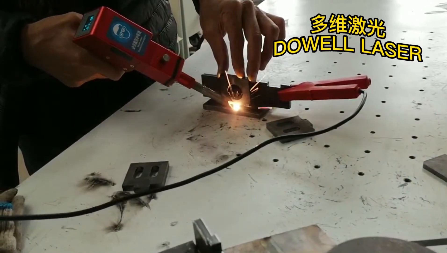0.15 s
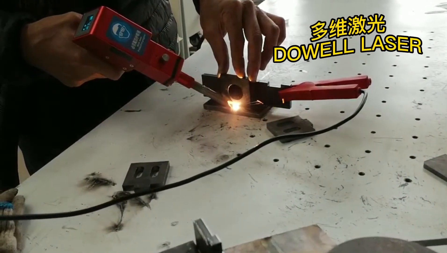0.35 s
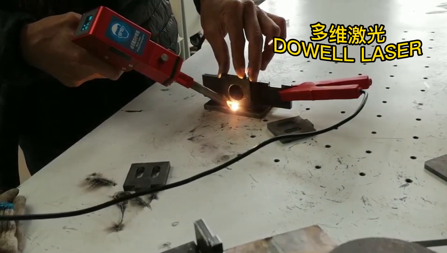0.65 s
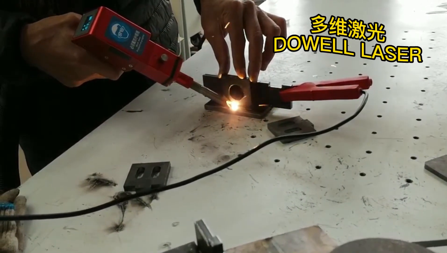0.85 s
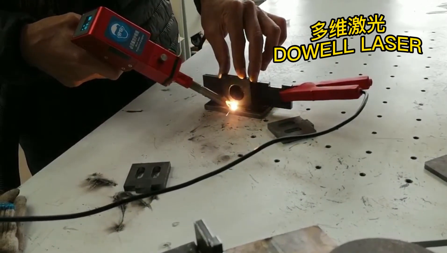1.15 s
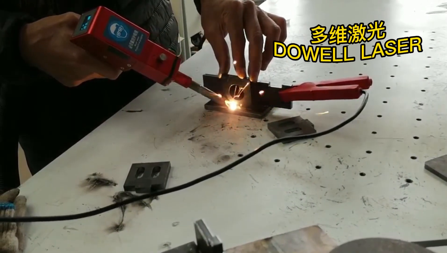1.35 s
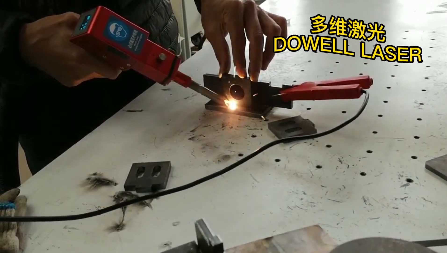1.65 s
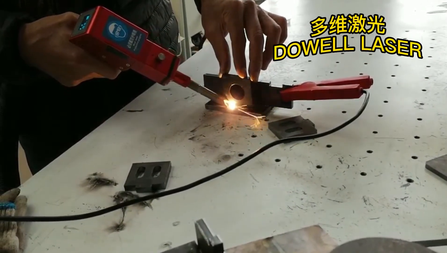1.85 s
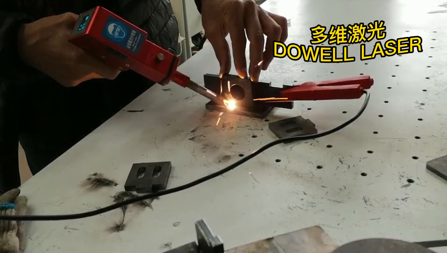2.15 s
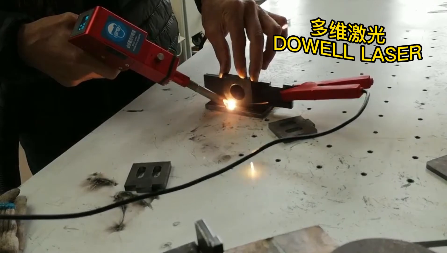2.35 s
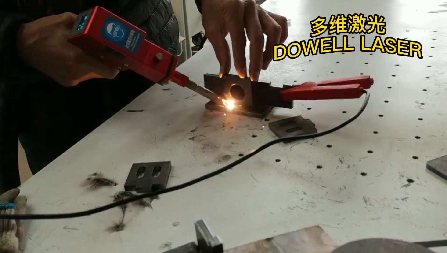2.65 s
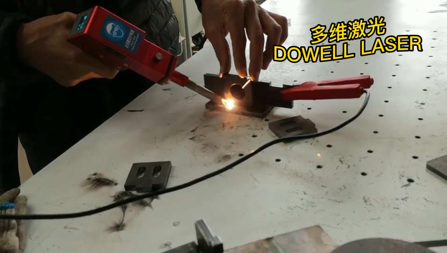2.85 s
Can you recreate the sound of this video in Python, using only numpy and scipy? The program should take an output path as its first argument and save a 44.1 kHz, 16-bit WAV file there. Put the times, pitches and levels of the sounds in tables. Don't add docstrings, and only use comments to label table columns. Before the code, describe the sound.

Bright gas jet hissing without pause from a laser welding torch, faint machine hum far behind

```python
import sys
import numpy as np
from scipy import signal
from scipy.fft import rfft, irfft, next_fast_len
from scipy.io import wavfile
from scipy.ndimage import uniform_filter1d, map_coordinates

SR = 44100
rng = np.random.default_rng(int(sys.argv[2]) if len(sys.argv) > 2 else 0)


def store_wav(level_fs):
    pcm = np.round(np.clip(np.atleast_2d(level_fs), -1, 1) * 32767)
    wavfile.write(sys.argv[1], SR, pcm.T.astype(np.int16))


def decibels_to_gain(level_db):
    exponent = np.asarray(level_db, float) / 20
    return 10 ** exponent


N = 132300


def unit(x):
    return x / np.sqrt(np.mean(x ** 2) + 1e-20)


def along(points, hz):
    f, v = np.transpose(points)
    return np.interp(np.log(hz + 1), np.log(f + 1), v)


def curves(rows):
    s, *cols = np.transpose(rows)
    return [np.interp(np.arange(N) / SR, s, c) for c in cols]


def wobble(rate):
    return map_coordinates(rng.standard_normal(N // 64), [np.arange(N) * min(rate, 600) / SR])


def filtered(x, response):
    m = next_fast_len(N + SR // 2)
    return irfft(rfft(x, m) * response(np.fft.rfftfreq(m, 1 / SR)), m)[..., :N]


def bumps(rows, hz):
    return sum(db / (1 + (2 * (hz - c) / w) ** 2) for c, w, db in rows)


def swells(rows, k, t):
    return sum(up * np.exp(-np.abs((t - s) / half) ** 3.1) for s, half, m, up in rows if round(m) == round(k))


def creeping(x, rows):
    hz, t, z = signal.stft(x, SR, nperseg=1024)
    change_db = bumps(rows, hz)[:, None] * (t - 1.5) / 2.1
    return signal.istft(z * decibels_to_gain(change_db), SR, nperseg=1024)[1][:N]


# place in the swing cycle, width (both as shares of a cycle), lift in dB.
BEAM_PASSES = [
    (.15, 0.03, 3),
    (.55, 0.049, 1.6),
    (.9, 0.1, -0.6),
]


def gas_turbulence():
    swing_hz, spit_hz, body_hz = 67.08, 249.8, 3870
    turn = np.arange(N) * swing_hz / SR
    swing_db = sum(db * np.exp((np.cos(2 * np.pi * (turn - at)) - 1) / (2 * np.pi * w) ** 2)
                   for at, w, db in BEAM_PASSES)
    z = signal.stft(rng.standard_normal((2, N)), nperseg=256)[2]
    field = uniform_filter1d(rng.standard_normal(z.shape[1:]), size=8, axis=0)
    field = uniform_filter1d(field, size=9, axis=1)
    pair = signal.istft(z * decibels_to_gain(0.2 * unit(field)), nperseg=256)[1][:, :N]
    body = filtered(pair, lambda f: f < body_hz)
    hiss_db = swing_db + 0.83 * wobble(spit_hz) + 0.3 * wobble(34.84)
    body_db = 0.86 * swing_db + 1.12 * wobble(spit_hz) + 0.69 * wobble(7.39)
    return (pair - body) * decibels_to_gain(hiss_db) + body * decibels_to_gain(body_db)


# frequency in Hz, level in dB.
NEAR_COLOUR = [(330, -50.0), (600, -33.5), (1200, -32.7), (2300, -25.0), (4000, -17.1), (7000, -8.6),
               (11000, -21.4), (15300, -33.0)]
# centre in Hz, width in Hz, lift in dB.
NEAR_PEAKS = [(1500, 599, 8.3), (2025, 539, 5.8), (2569, 863, 6.8), (3177, 236, 8.0), (3679, 144, -0.9),
              (4116, 150, 2.8), (5379, 900, 10.7), (5723, 202, 4.7), (6627, 181, 5.6), (7506, 784, 5.1),
              (8700, 300, 2), (9217, 201, 4.5), (10789, 500, 7.6), (12142, 1399, 5.3), (14879, 350, 1.8)]
# centre in Hz, width in Hz, change in dB.
NEAR_DIPS = [(1710, 164, -5.2), (2214, 82, -8.2), (3116, 299, -10.6), (3435, 109, -5.7), (3865, 160, -11),
             (4310, 90, -3), (8960, 150, -3), (4803, 246, -4.5), (8153, 347, -10.2), (9447, 100, -2.6),
             (10000, 250, -1.9), (11632, 133, -16.3), (12911, 108, -12.8), (13376, 209, -12.5),
             (13575, 106, -11.4), (14028, 399, -8.1)]
# centre in Hz, width in Hz, change in dB.
NEAR_CREEP = [(3340, 120, 3), (3470, 90, -4), (3590, 180, -4), (3900, 100, -10), (4140, 150, -2),
              (4310, 90, -3), (4600, 200, -2), (5600, 500, -1), (6150, 400, 2), (7000, 350, 3.5),
              (7750, 400, 3), (8100, 150, 2), (8400, 300, -3), (10480, 500, -7), (11200, 400, -3),
              (12050, 400, -3), (12650, 400, 4)]


def near_port(pair):
    def response(f):
        return decibels_to_gain(along(NEAR_COLOUR, f) + bumps(NEAR_PEAKS, f) + bumps(NEAR_DIPS, f)) * (f > 300)
    return creeping(filtered(pair[0], response), NEAR_CREEP)


# frequency in Hz, level in dB.
SHADOW_COLOUR = [(330, -45.3), (650, -39.2), (1000, -50.1), (1600, -30.6), (3500, -34.0), (7000, -27.8),
                 (11000, -52.4), (15300, -56.8)]
# centre in Hz, width in Hz, change in dB.
SHADOW_PEAKS = [(2001, 433, 3.7), (3091, 109, -6.9), (4627, 186, -7.2), (5071, 239, -16.2),
                (5670, 553, 6.4), (6577, 200, 1.3), (7120, 583, -13.0), (8203, 165, -9.9), (9079, 580, 6.2),
                (9681, 699, -14.3), (10779, 996, 11.8), (11453, 337, -10.8), (13797, 160, -7.7),
                (14158, 329, -11.5)]
# centre in Hz, width in Hz, change in dB.
SHADOW_CREEP = [(4100, 500, -3), (7050, 400, -5), (10050, 350, 18), (10600, 600, -5), (11750, 400, -14),
                (12300, 400, 8), (13300, 700, -5), (14700, 500, 5)]
# frequency in Hz, share common to both.
ALIKE = [(350, .5), (650, .85), (980, .2), (1500, .9), (3000, .6), (5700, .82), (8000, .66), (13000, .5)]
# frequency in Hz, extra lag in radians.
PHASE_TURN = [(600, 0.9), (1500, 1.4), (3000, -0.0043), (5700, -1.26)]


def shadowed_port(pair):
    lag_s = 0.000588

    def response(f):
        alike = np.clip(along(ALIKE, f), 0, 1)
        common = alike * np.exp(-1j * (2 * np.pi * f * lag_s + along(PHASE_TURN, f)))
        own = np.sqrt(1 - alike ** 2)
        colour = decibels_to_gain(along(SHADOW_COLOUR, f) + bumps(SHADOW_PEAKS, f))
        return np.array([common, own]) * colour * (f > 300)
    return creeping(filtered(pair, response).sum(axis=0), SHADOW_CREEP)


# time in seconds, jet level in dB, lift of the top sizzle in dB.
GAS_FLOW = [
    (0, -18.5, 3.5),
    (.12, -19, 5),
    (.5, -19, 3),
    (.9, -19, 2.5),
    (1.2, -19, 1.5),
    (1.7, -18.5, -1),
    (2.2, -19, 0),
    (2.6, -19, 0),
    (3, -19, 0.5),
]


def jet():
    level_db, top_db = curves(GAS_FLOW)
    pair = gas_turbulence()
    near = near_port(pair)
    both = np.array([shadowed_port(pair), near]) / near.std()
    top = filtered(both, lambda f: f > 12900)
    return (both + top * (decibels_to_gain(top_db) - 1)) * decibels_to_gain(level_db + 6.0)


def tone(cycles, db):
    return np.sqrt(2) * decibels_to_gain(db) * np.sin(2 * np.pi * (cycles + rng.random() + 0.022 * wobble(8.0)))


# multiple of the shaft rate, level in dB.
PUMP = [
    (1, -52),
    (2, -60),
    (3, -66),
    (12, -66.5),
]
# centre in seconds, half length in seconds, multiple, lift in dB.
PUMP_SURGES = [(0.3, 0.064, 2, 12.5), (0.77, 0.086, 2, 10), (0.91, 0.067, 2, 10), (1.126, 0.068, 2, 9),
               (1.99, 0.21, 2, 9), (0.63, 0.17, 1, 4.5), (0.21, 0.069, 1, -17), (1.745, .1, 1, 1.5),
               (0.57, 0.4, 12, 5.5), (2.72, .12, 12, 10), (2.43, 0.28, 2, 5)]


def chiller_pump():
    t, shaft_hz = np.arange(N) / SR, 26.6
    return sum(tone(round(k) * shaft_hz * t, db + swells(PUMP_SURGES, k, t) + 1.4 / np.sqrt(k) * wobble(13))
               for k, db in PUMP)


# frequency in Hz, level in dB.
MAINS = [
    (100.2, -68.5),
    (288, -68.5),
]


def mains_hum():
    t = np.arange(N) / SR
    return sum(tone(hz * t, db + 5.2 * wobble(5.4)) for hz, db in MAINS)


# time in seconds, firing rate in Hz, load in dB.
ENGINE_RUN = [
    (0, 35.3, -3),
    (.55, 35.78, -1.5),
    (.85, 35.63, 1),
    (1.1, 34.87, 1.5),
    (1.5, 34.38, 0.5),
    (1.9, 33.93, -1),
    (2.25, 33.57, -8.5),
    (2.6, 33.67, -1.5),
    (3, 33.6, -1.5),
]
# multiple of the firing rate, level in dB.
ENGINE_ORDERS = [(3, -63.5), (4, -60.5), (5, -61.5), (6, -61.5), (7, -69.5), (8, -65.5), (9, -65.5),
                 (10, -74.5)]
# centre in seconds, half length in seconds,
# multiple, lift in dB.
HALL_BOOMS = [(0.16, .2, 4, 6.5), (0.13, 0.083, 6, -2), (0.71, 0.2, 4, 15.5), (1.115, 0.13, 4, 14),
              (1.41, 0.11, 4, 7.5), (1.064, 0.15, 7, 17.5), (1.06, 0.2, 5, 6), (1.1, 0.072, 6, 6),
              (2.385, 0.088, 6, 12), (2.75, 0.2, 6, 12.5), (2.74, 0.13, 9, 7.5), (2.13, 0.33, 8, 10),
              (2.82, .15, 8, 9.5)]


def slowing_engine():
    t = np.arange(N) / SR
    firing_hz, load_db = curves(ENGINE_RUN)
    turns = np.cumsum(firing_hz) / SR
    return sum(tone(round(k) * turns, db + load_db + swells(HALL_BOOMS, k, t) + 1.4 * wobble(8.13))
               for k, db in ENGINE_ORDERS)


# frequency in Hz, side under mid in dB.
HALL_WIDTH = [(30, -20), (100, -19), (200, -6), (330, -1)]


def machines():
    mid = chiller_pump() + mains_hum() + slowing_engine()
    side = filtered(mid, lambda f: -1j * decibels_to_gain(along(HALL_WIDTH, f) - 1.0))
    return np.array([mid + side, mid - side])


def low_noise(spectrum, level_db, swing_db):
    mid, side = rng.standard_normal((2, N))
    mid = filtered(mid, lambda f: decibels_to_gain(along(spectrum, f)))
    side = filtered(side, lambda f: decibels_to_gain(along(spectrum, f) + along(HALL_WIDTH, f)))
    return decibels_to_gain(level_db + swing_db * wobble(5.02)) * np.array([mid + side, mid - side]) / mid.std()


# frequency in Hz, density in dB per Hz.
HALL_COLOUR = [(60, -29), (100, -3.5), (200, 1.5), (325, -4.5), (345, -6), (365, -14), (600, -48),
               (1000, -60)]


def workshop_air():
    return low_noise(HALL_COLOUR, -57.5, swing_db=-0.4)


# frequency in Hz, density in dB per Hz.
FLOOR_COLOUR = [(8, -20), (25, -3.5), (45, -9), (70, -11), (95, -9.5), (130, -44)]


def floor_rumble():
    return low_noise(FLOOR_COLOUR, -52, swing_db=0.7)


def scene():
    return jet() + machines() + workshop_air() + floor_rumble()


# centre in seconds, half length in seconds,
# group (always 1), gate lift in dB.
TREBLE_GAPS = [(1.22, .025, 1, 6), (1.42, .05, 1, 3), (1.53, .04, 1, 4), (1.69, .035, 1, 5),
               (1.89, .045, 1, 9), (2.08, .03, 1, 5), (1.98, .035, 1, -5), (2.15, .03, 1, 2),
               (2.24, .02, 1, 5), (2.37, .13, 1, 4), (2.7, .045, 1, 9), (2.82, .06, 1, 3),
               (2.92, .02, 1, -5), (2.97, .03, 1, 9), (1.62, .03, 1, -5), (1.79, .05, 1, -6),
               (2.55, .04, 1, -5), (2.62, .04, 1, -5)]


def thin_weak_bands(x, margin, top_hz):
    hz, t, z = signal.stft(x, SR, window="cosine", nperseg=2048)
    z, line_hz = z[:1024], hz[:1024, None]
    power = np.abs(z) ** 2
    bands = uniform_filter1d(power.reshape(128, 8, -1).mean(axis=1), size=2, axis=1)
    centre = hz[4:1024:8]
    broad = uniform_filter1d(np.log10(bands.mean(axis=1) + 1e-14) * 10, size=13, mode="nearest")
    broad = np.where(centre > 14000, broad[np.searchsorted(centre, 14000)], broad)
    frame_at = np.minimum(t * SR, N - 1).astype(int)
    gate_db = (broad - along(margin, centre))[:, None] + 1.0 * wobble(25)[frame_at]
    scatter = uniform_filter1d(rng.standard_normal(bands.shape), size=3, axis=0)
    gate_db = gate_db + 2.0 * unit(scatter)
    low_hz, high_hz = 12900, 14400
    first = (centre > low_hz) & (centre < high_hz)
    tilt = np.interp(centre, (low_hz, high_hz), (1.2, .7))
    gate_db = gate_db + first[:, None] * swells(TREBLE_GAPS, 1, t) * tilt[:, None]
    keep = np.repeat((bands > decibels_to_gain(2 * gate_db)) | (centre[:, None] < 1500), 8, axis=0) & (line_hz < top_hz)
    lines = uniform_filter1d(power, size=2, axis=0) > np.repeat(decibels_to_gain(2 * (gate_db + 1)), 8, axis=0)
    keep = keep & (lines | (line_hz < 2500))
    return signal.istft(np.pad(z * keep, ((0, 1), (0, 0))), SR, window="cosine", nperseg=2048)[1][:N]


def top_cut(x):
    return signal.sosfilt(signal.butter(12, 15260, fs=SR, output="sos"), x)


# frequency in Hz, margin in dB.
MARGIN_LEFT = [(2000, 9), (3000, 6), (5000, 6), (8000, 3), (10000, 2), (12000, 0), (13500, .5), (15000, 1)]
# frequency in Hz, margin in dB.
MARGIN_RIGHT = [(2000, 13), (3500, 8), (8000, 14), (11500, 10), (12700, 6), (13100, 2), (14000, 3),
                (14700, 3.5), (15100, 2)]


def record(dry):
    ceiling, knee = .9, 6
    soft = dry / (1 + np.abs(dry / ceiling) ** knee) ** (1 / knee)
    left = thin_weak_bands(soft[0], MARGIN_LEFT, top_hz=15000)
    right = thin_weak_bands(soft[1], MARGIN_RIGHT, top_hz=15110)
    return top_cut(np.array([left, right]))


dry = scene()
out = record(dry)
store_wav(out)
```